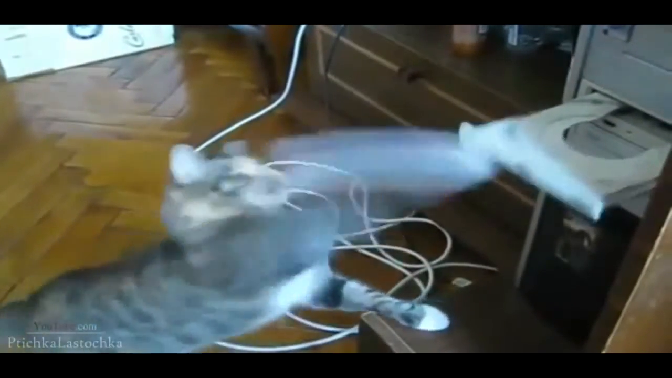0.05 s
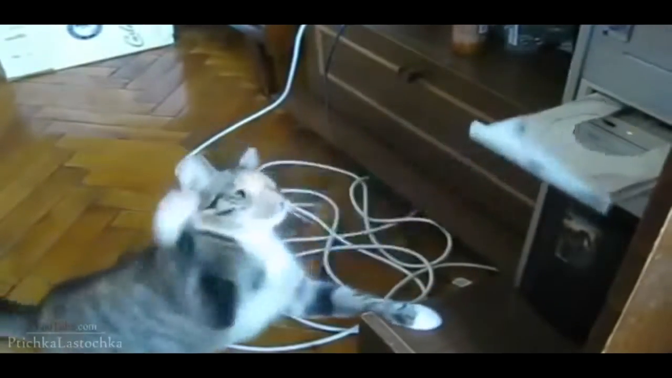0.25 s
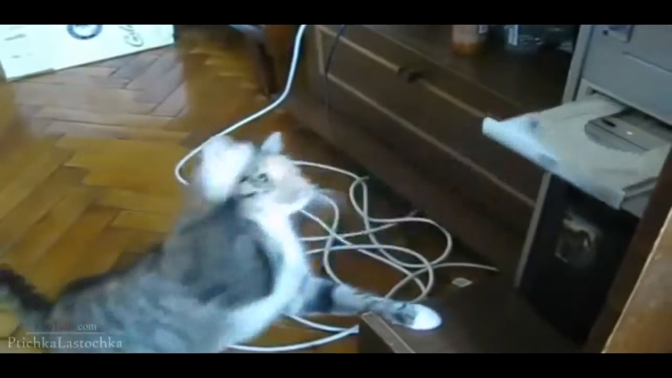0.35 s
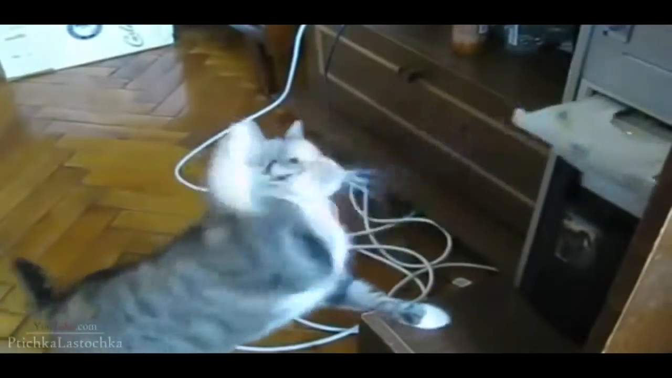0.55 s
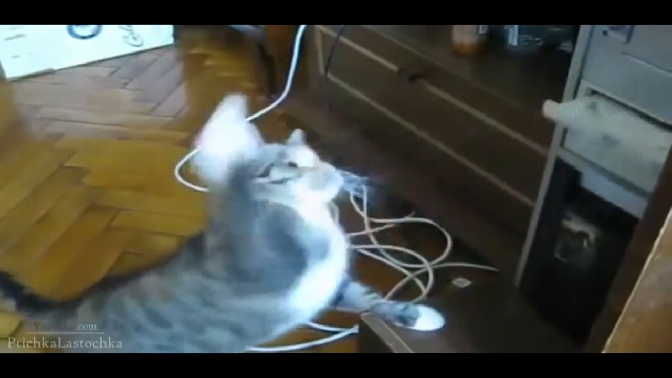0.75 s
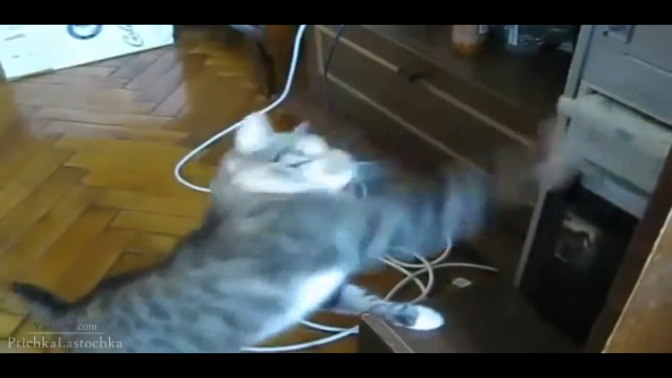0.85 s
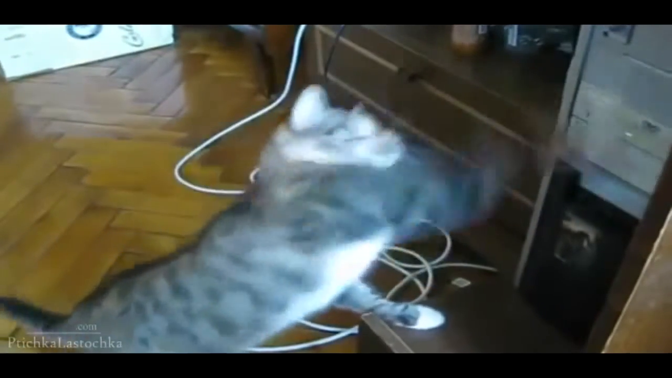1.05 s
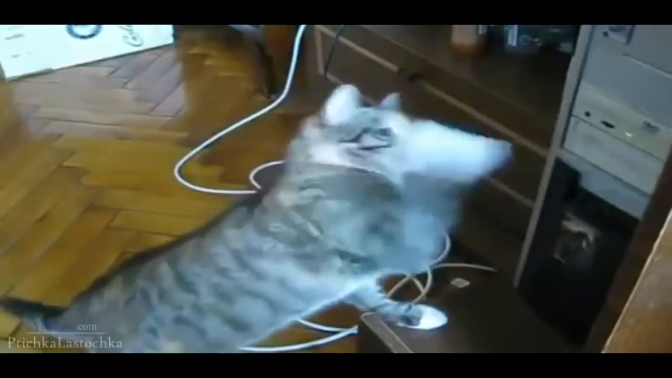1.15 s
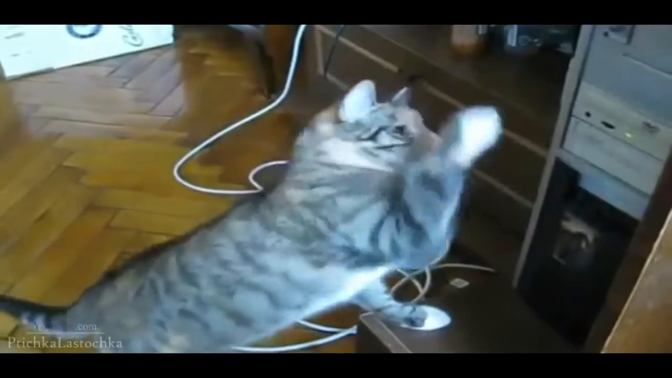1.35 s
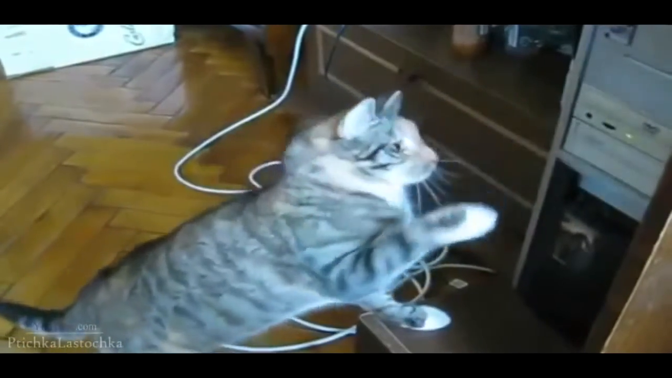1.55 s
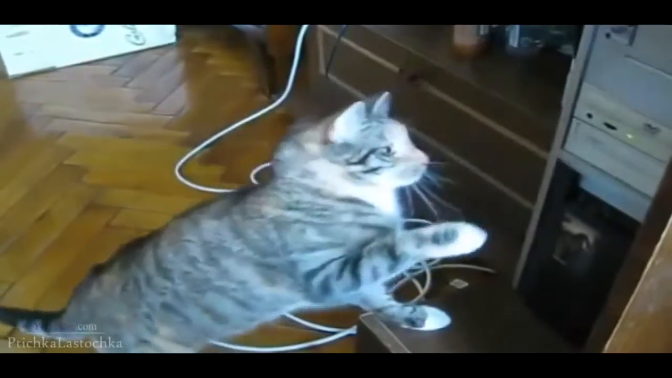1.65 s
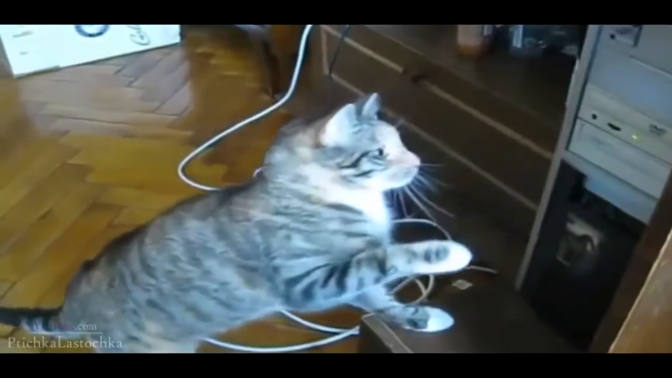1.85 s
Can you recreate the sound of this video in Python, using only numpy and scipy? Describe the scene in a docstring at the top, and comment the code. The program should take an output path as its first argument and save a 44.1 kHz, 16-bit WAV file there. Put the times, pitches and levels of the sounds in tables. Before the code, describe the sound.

After a moment of quiet fan hum, bright plastic clacks rattle quickly, a few more snap out over motor whirr, and the drive tray latches closed; the room rings on, captured by a cheap, limiting camera microphone.

```python
"""The plastic tray of a computer's disc drive, in a room, is knocked by a cat's paw and motors shut.
It clacks in its rails (decaying modes plus a crack of noise), then bumps home and latches in the case.
The gears whirr and growl beneath (tooth clicks and rubbing noise through two spectra).
The room rings on and a fan hums steadily behind (shaped noise, narrow resonances).
At the camera's microphone a limiter ducks after every loud clack and overloads on its front."""
import sys
import numpy as np
from scipy import signal
from scipy.fft import rfft, irfft
from scipy.io import wavfile
from scipy.ndimage import uniform_filter1d

SR = 44100
rng = np.random.default_rng(int(sys.argv[2]) if len(sys.argv) > 2 else 0)


def master_out(mix):
    """Clip the mix to full scale and print it as 16-bit PCM to the path in sys.argv[1]."""
    frames = np.transpose(np.atleast_2d(mix))
    ceiling = np.clip(frames, -1, 1)
    pcm = np.round(ceiling * 32767).astype(np.int16)
    wavfile.write(sys.argv[1], SR, pcm)


N = 85995  # length of the take [samples]

# Knocks of the tray in its rails, and the faint ticks of the gears from 0.58 to 0.69 s: (time [s], strength
# [dB], favoured ring [Hz], body [dB], crack [dB], contact [s])
TRAY_CLACKS = [(0.2075, 0, 3920, -7, -4, 0.0035), (.2320, -7.5, 4300, -6, 2.5, 0.0012),
               (.2585, -10.5, 4220, -16, -3, 0.0019), (0.3244, -15, 3900, 3, 2.5, 0.0021),
               (0.3421, -0.5, 4090, -7.5, -1, 0.0018), (0.4376, -21.5, 3600, 7, 2, 0.0045),
               (.4800, -13, 4700, -10, 0, 0.0013), (0.5241, -17.5, 3620, 1, -3.5, 0.0055),
               (0.5845, -36, 5270, -5, 0, .002), (0.6078, -24, 4200, 9, -2, 0.0018),
               (0.6322, -29.5, 3950, -7, -10, 0.0065), (0.65, -38, 4100, 4, 3, .003),
               (0.6662, -25.5, 3700, 7, -7, 0.0052), (.6850, -23, 3630, 10, -2.5, 0.002),
               (0.7297, 2, 2940, 1, -0.5, 0.0012), (0.752, -16.5, 3900, 9, 8, 0.004),
               (.8940, -7.5, 3900, 3, 6.5, 0.0029), (0.9119, -17.5, 3500, 4.5, 10, 0.0041),
               (1.1100, 2, 3120, -1, -3.5, 0.0035), (1.1206, -17.5, 2510, 9, -2, 0.009),
               (1.135, -19, 4000, 8, 8, .003), (1.338, -14.5, 3470, -9, 0, 0.0082)]
# Modes of the plastic tray: (frequency [Hz], level [dB], t60 [s])
TRAY_MODES = [(1080, -1.5, 0.018), (1802, -2, 0.022), (2205, -6, 0.02), (2504, -2, 0.015),
              (2780, -5.5, 0.022), (3200, -2, 0.012), (3490, -7.5, 0.049), (3803, -7, 0.019),
              (4083, -2.5, 0.013), (4454, -3.5, 0.013), (4854, -4, 0.02), (5280, -6, 0.01),
              (6580, -7, 0.01)]
# Crack of plastic on plastic, relative spectrum: (frequency [Hz], density [dB per Hz])
CRACK_SPECTRUM = [(40, -19), (200, -24), (500, -9), (1000, -9.5), (2000, -3), (4000, 1), (6500, -3.5),
                  (9700, -10.5), (11000, -18), (15000, -23)]
BODY_TOP_HZ = 2100


def clacks():
    """The tray knocks in its rails; each contact favours another mode and has more or less body."""
    out = np.zeros(N)
    mode_hz = np.transpose(TRAY_MODES)[0]
    for s, strength_db, centre_hz, body_db, crack_db, contact_s in TRAY_CLACKS:
        def body_shelf_db(hz):
            """Raises or lowers what lies below the top of the body."""
            return body_db / (1 + (hz / BODY_TOP_HZ) ** 6)

        weight_db = favour(TRAY_MODES, centre_hz) + body_shelf_db(mode_hz)
        ring, crack = strike(TRAY_MODES, weight_db, crack_db, contact_s)
        spectrum = [(hz, level_db + body_shelf_db(hz)) for hz, level_db in CRACK_SPECTRUM]
        add(out, s, amp(strength_db) * (ring + colour(crack, spectrum)))
    return out


# The tray meets the case, a soft bump and then the latch:
# (time [s], strength [dB], centre of the ring [Hz], top of the crack [Hz], crack [dB], contact [s])
CASE_BUMPS = [(1.291, -13, 727, 1090, -8.5, 0.0017), (1.3159, 2.5, 1170, 11000, -7, 0.0012)]
# Modes of the drive's case: (frequency [Hz], level [dB], t60 [s])
CASE_MODES = [(600, -11.5, .04), (752, -3.5, 0.017), (1095, -2.5, 0.016), (1346, -16.5, 0.035),
              (1842, 4, 0.016), (2219, 4.5, 0.023), (2790, -2.5, 0.086), (3016, 3, 0.016), (3700, 3, 0.026),
              (4190, 0, 0.029)]
# Thud against the case, relative spectrum: (frequency [Hz], density [dB per Hz])
THUD_SPECTRUM = [(60, -38), (160, -10.5), (260, 7), (380, -3), (800, 4), (1500, -4.5), (2200, 4.5),
                 (4500, 0), (7000, -6), (14000, -20.5)]


def bumps():
    """A soft bump and then the latch ring the case; each crack loses treble above its own top."""
    out = np.zeros(N)
    for s, strength_db, centre_hz, top_hz, crack_db, contact_s in CASE_BUMPS:
        ring, crack = strike(CASE_MODES, favour(CASE_MODES, centre_hz), crack_db, contact_s)
        spectrum = [(hz, level_db - 10 * np.log10(1 + (hz / top_hz) ** 2))
                    for hz, level_db in THUD_SPECTRUM]
        add(out, s, amp(strength_db) * (ring + colour(crack, spectrum)))
    return out


# Running gears: (time [s], whirr level [dB], growl level [dB])
GEAR_LEVELS = [(.2, -56, -48.5), (0.226, -16.5, -27), (.31, -29, -34), (.39, -33, -34.5),
               (0.471, -23.5, -35.5), (.57, -36.5, -40), (0.701, -38, -39), (0.801, -19.5, -29),
               (0.882, -36, -36), (1.012, -26, -31.5), (1.09, -34.5, -36), (1.21, -26, -37.5),
               (1.28, -37.5, -39), (1.38, -22.5, -34), (1.462, -67, -48)]
# Whirr through the tray, relative spectrum: (frequency [Hz], density [dB per Hz])
WHIRR_SPECTRUM = [(300, -8), (800, -5.5), (1450, -2), (1800, 4.5), (2500, 5), (3200, 5), (4300, 1.5),
                  (6500, -3.5), (9700, -14.5), (11000, -15.5), (15000, -52.5)]
# Growl in the case, relative spectrum: (frequency [Hz], density [dB per Hz])
GROWL_SPECTRUM = [(30, -49), (90, -4), (160, 2), (210, 1), (260, 4.5), (350, -18.5), (480, 0), (580, 6.5),
                  (720, -4), (1100, 3), (1800, 3.5), (5000, -24)]
TEETH_PER_S, TOOTH_SPREAD_DB = 320, 2.5
RUB_SHARE = .75  # share of the power that is sliding noise


def gears():
    """Uneven tooth clicks and sliding noise sound through the tray and growl in the case."""
    s, whirr_db, growl_db = np.transpose(GEAR_LEVELS)
    t = np.arange(N) / SR
    wobble = unit(uniform_filter1d(rng.standard_normal(N), 400))
    teeth_passed = np.cumsum(TEETH_PER_S * (1 + .1 * wobble)) / SR
    clicks = np.diff(np.floor(teeth_passed), prepend=0)
    clicks = clicks * amp(TOOTH_SPREAD_DB * rng.standard_normal(N)) * rng.choice([-1, 1], N)
    rub = rng.standard_normal(N)
    force = np.sqrt(1 - RUB_SHARE) * unit(clicks) + np.sqrt(RUB_SHARE) * rub
    whirr = colour(force * amp(np.interp(t, s, whirr_db)), WHIRR_SPECTRUM)
    growl = colour(force * amp(np.interp(t, s, growl_db)), GROWL_SPECTRUM)
    return whirr + growl


# Reverberation of the room: (frequency [Hz], t60 [s], relative level [dB])
ROOM_BANDS = [(100, 0.17, -30), (265, 0.68, 3), (610, 0.57, -2), (1090, 0.46, -4), (1920, 0.53, -6.5),
              (3740, 0.55, -7.5), (6500, 0.47, -9.5), (14000, 0.23, -6)]
ROOM_DB, ROOM_BUILD_S = -1, 0.0027


def room(x):
    """Dense reflections build up quickly; each band of a noise tail dies at its own rate."""
    hz, t, noise = signal.stft(rng.standard_normal(SR), SR, nperseg=256)
    bands = np.array(ROOM_BANDS)
    t60 = read(bands[:, :2], hz)[:, None]
    level_db = read(bands[:, ::2], hz)[:, None]
    even_energy = np.sqrt(2 * np.log(1000) / t60 / SR)  # a longer decay is not a louder one
    decay = amp(level_db - 60 * t / t60)
    tail = signal.istft(noise * decay * even_energy, SR, nperseg=256)[1]
    tail *= 1 - np.exp(-np.arange(len(tail)) / SR / ROOM_BUILD_S)
    return amp(ROOM_DB) * signal.fftconvolve(x, tail)[:N]


# Rush of air from the fan, relative spectrum: (frequency [Hz], density [dB per Hz])
FAN_SPECTRUM = [(25, -5), (60, 9.5), (150, 5.5), (400, 5), (600, -7), (800, 2), (1200, -6.5), (1950, -47),
                (2600, -2.5), (3200, 2.5), (4500, -3.5), (6800, -7.5), (9700, -10), (11000, -12),
                (15000, -27)]
FAN_DB = -54
# Resonances of the fan: (frequency [Hz], width [Hz], level [dB])
FAN_RESONANCES = [(725, 75, -60.5), (778, 6.7, -67), (878, 4, -61.5), (1235, 60, -58), (1654, 130, -58),
                  (2215, 150, -57.5)]


def fan():
    """Steady rush of air with a few narrow resonances, all filtered noise."""
    f = np.fft.rfftfreq(N, 1 / SR)
    air = irfft(rfft(rng.standard_normal(N)) * amp(read(FAN_SPECTRUM, f)), N)
    out = amp(FAN_DB) * unit(air)
    for hz, width_hz, level_db in FAN_RESONANCES:
        peak = 1 / (1 + (2 * (f - hz) / width_hz) ** 2)
        out += amp(level_db) * unit(irfft(rfft(rng.standard_normal(N)) * peak, N))
    return out


CRACK_DB, CRACK_T60_S = -3.5, 0.045
RING_DB, DETUNE = -4.5, .006  # detune is the rms spread of each mode, as a fraction
SMALL_PANEL_HZ = 450  # small panels radiate little below this


def strike(modes, weight_db, crack_db, contact_s, size=8192):
    """One blow: modes that radiate little bass and a crack hold during the contact, then die."""
    t = np.arange(size) / SR
    free_s = np.maximum(t - contact_s, 0)
    hz, level_db, t60 = np.transpose(modes)[:, :, None]
    hz = hz * (1 + DETUNE * rng.standard_normal(hz.shape))
    sign = rng.choice([-1, 1], hz.shape)
    decay = amp(level_db + weight_db[:, None] - 60 * free_s / t60)
    ring = (sign * decay * np.sin(2 * np.pi * hz * t)).sum(0)
    panel = signal.butter(2, SMALL_PANEL_HZ, "highpass", fs=SR, output="sos")
    ring = amp(RING_DB) * signal.sosfilt(panel, ring)
    crack = amp(CRACK_DB + crack_db - 60 * free_s / CRACK_T60_S) * rng.standard_normal(size)
    return ring, crack


STRONGEST_DB, STRONGEST_OCTAVES = 5, .06  # extra for a mode at the favoured pitch
RING_OCTAVES = 0.64  # reach among the neighbouring modes


def favour(modes, centre_hz):
    """The place of contact brings out one mode and favours its neighbours (dB per mode)."""
    octaves = abs(np.log2(np.transpose(modes)[0] / centre_hz))
    strongest_db = STRONGEST_DB * np.exp(-(octaves / STRONGEST_OCTAVES) ** 2)
    return strongest_db - 6 * (octaves / RING_OCTAVES) ** 2 / (1 + octaves)


def amp(db):
    """Decibels to gain."""
    return 10 ** (np.asarray(db) / 20)


def unit(x):
    """Scales to rms 1."""
    return x / np.sqrt(np.mean(x ** 2) + 1e-20)


def read(points, hz):
    """Reads a spectrum on a log-frequency axis."""
    f, value = np.transpose(points)
    return np.interp(np.log(hz + 1), np.log(f), value)


def add(mix, s, sound):
    """Mixes a sound in at a time in seconds."""
    part = mix[round(s * SR):][:len(sound)]
    part += sound[:len(part)]


def colour(x, points, size=4096):
    """Causal minimum-phase filter of unit energy with the given spectrum."""
    log_gain = np.log(amp(read(points, abs(np.fft.fftfreq(size, 1 / SR)))))
    response = np.exp(np.conj(signal.hilbert(log_gain)))
    taps = np.fft.ifft(response).real[:size // 2]
    return signal.fftconvolve(x, taps / np.linalg.norm(taps))[:len(x)]


CASE_ROOM_DB = 2.5  # the case radiates all round, so it feeds the room more than the tray does


def scene():
    """The drive in its room, over the fan."""
    tray = clacks() + gears()
    case = bumps()
    reflections = room(tray + amp(CASE_ROOM_DB) * case)
    return (tray + case + reflections + fan())[None]


LIMIT_DB, ATTACK_S = -3.5, 0.0014
OVERSHOOT_FALL_DB_PER_S, DUCK_SHARE = 125.5, 0.79  # the gain is cut by this share of the overshoot
CEILING = .88
NOTCH_HZ, NOTCH_WIDTH_HZ, NOTCH_DB = 7895, 334, -21.5
EDGE_HZ = 15050  # top of the band


def record(dry):
    """A limiter ducks after each loud clack as its front overloads; then a notch and the band limit."""
    x = dry[0]
    fall_db = np.arange(N) / SR * OVERSHOOT_FALL_DB_PER_S
    over_db = np.maximum(20 * np.log10(abs(x) + 1e-9) - LIMIT_DB, 0)
    held_db = np.maximum.accumulate(over_db + fall_db) - fall_db  # peaks held, falling steadily
    r = np.exp(-1 / (ATTACK_S * SR))
    duck_db = DUCK_SHARE * signal.lfilter([1 - r], [1, -r], held_db)
    x = CEILING * np.tanh(x * amp(-duck_db) / CEILING)
    f = np.fft.rfftfreq(N, 1 / SR)
    notch = amp(NOTCH_DB * np.exp(-abs(f - NOTCH_HZ) / NOTCH_WIDTH_HZ))
    x = irfft(rfft(x) * notch, N)
    band = signal.firwin(127, EDGE_HZ, window=("kaiser", 9), fs=SR)
    return signal.fftconvolve(x, band, "same")[None]


dry = scene()
out = record(dry)
master_out(out)
```